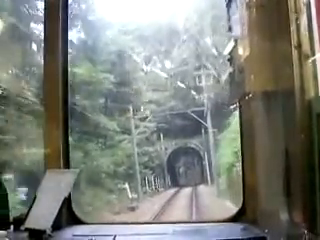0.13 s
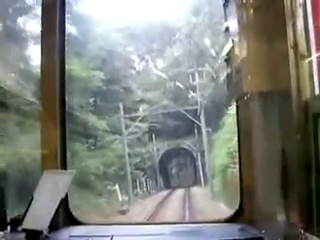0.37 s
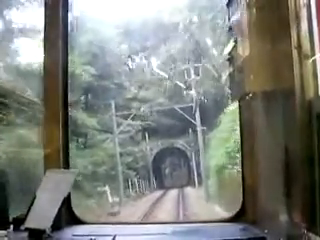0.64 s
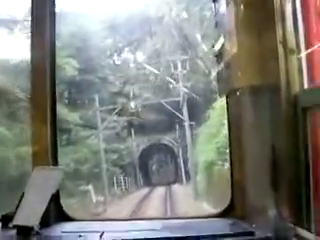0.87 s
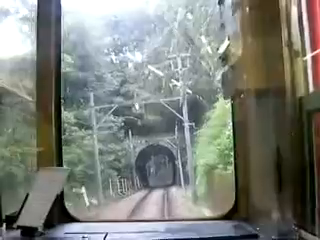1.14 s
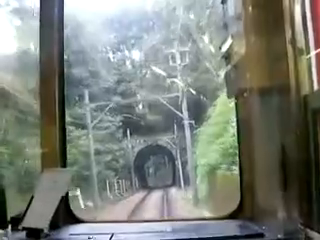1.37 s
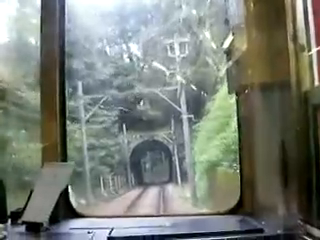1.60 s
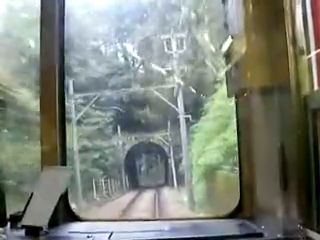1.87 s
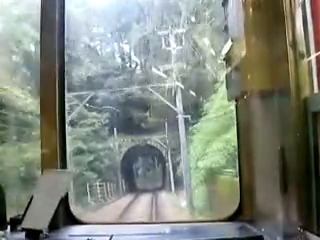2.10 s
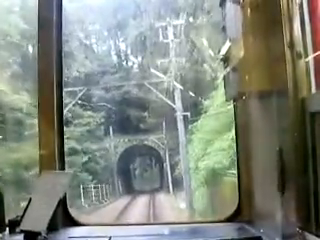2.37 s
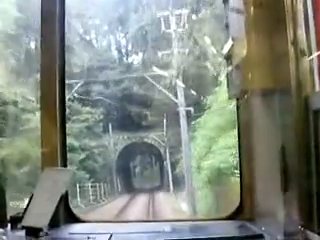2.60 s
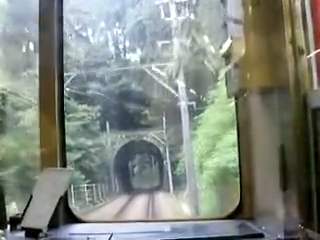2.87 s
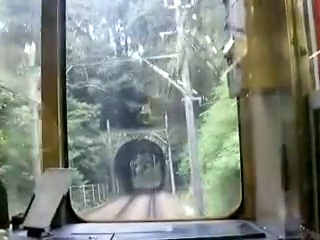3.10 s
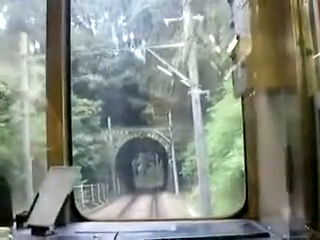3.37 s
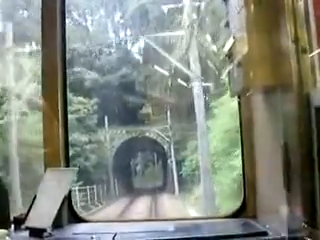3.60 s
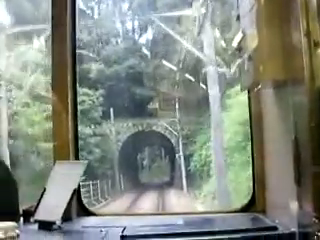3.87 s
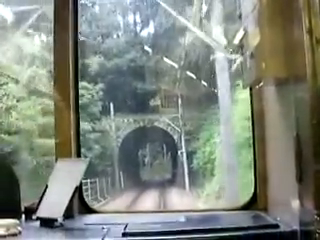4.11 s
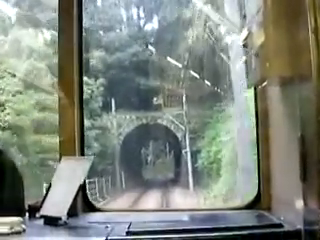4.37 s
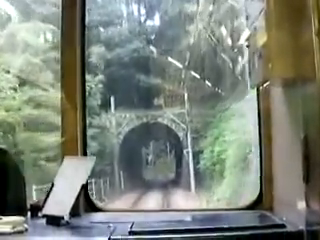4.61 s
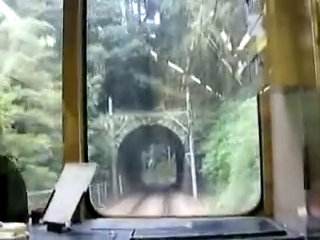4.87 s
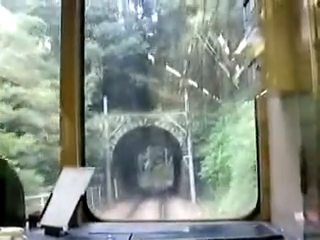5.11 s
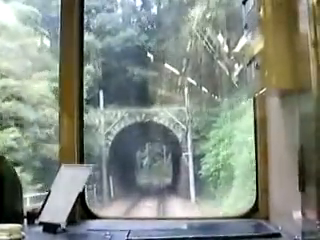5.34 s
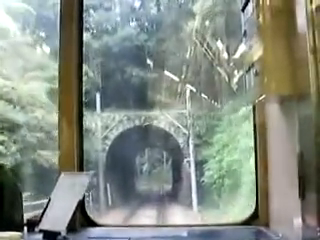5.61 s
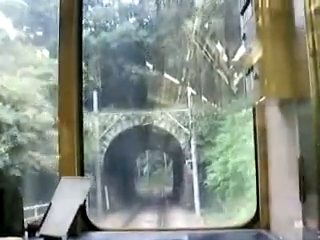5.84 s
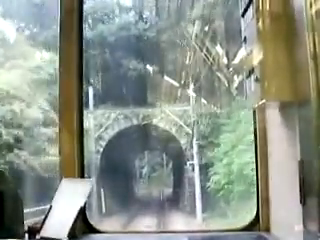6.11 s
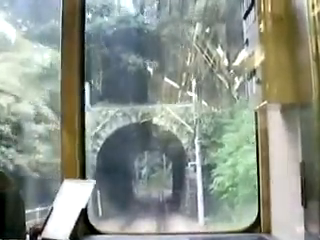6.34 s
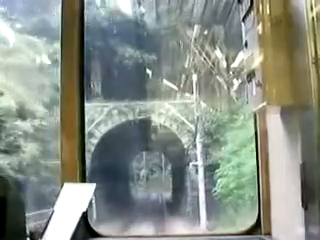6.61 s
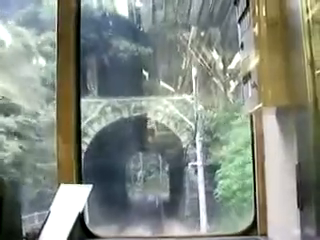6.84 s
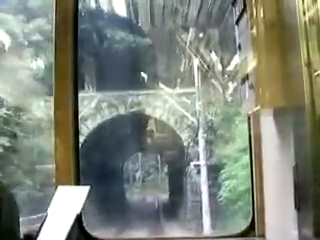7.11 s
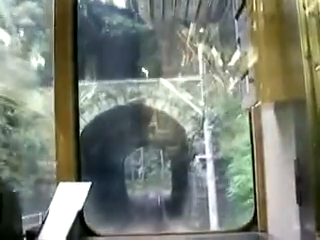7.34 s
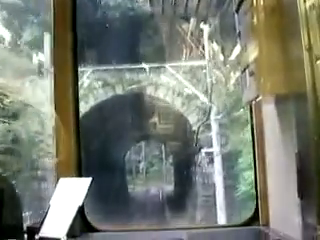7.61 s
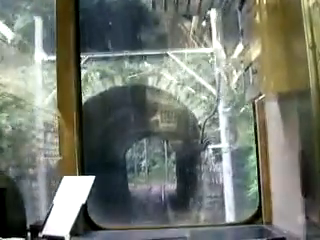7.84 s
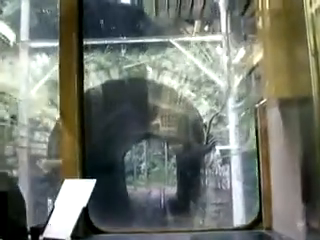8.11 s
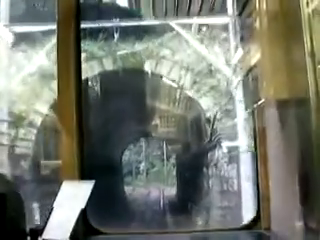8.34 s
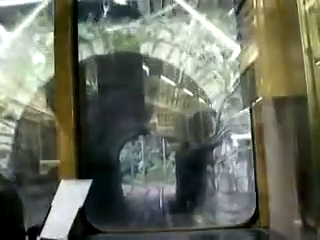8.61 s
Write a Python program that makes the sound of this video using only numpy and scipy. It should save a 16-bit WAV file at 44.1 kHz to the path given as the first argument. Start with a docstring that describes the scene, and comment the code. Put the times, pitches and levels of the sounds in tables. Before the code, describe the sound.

A motor whine holds in the middle of the sound while the floor drones and steel wheels roar beneath an electric train cab. Rail joints strike in clusters, each a metallic clatter with a dull thump, with small squeaks and faint hissing spits in between. The roar grows fuller after the first seconds and the whine climbs gently, ending in more knocks. Close stereo, interior perspective.

```python
"""A low hum, a gear whine and a flurry of rail knocks open the scene, in the cab of an electric railcar.
The car gains a little speed: wavering sines whine upward over body hums and thin blower tones.
Flickering bands of noise make the rumble, floor drone, wheel roar and top hiss; resonances ring the wheels.
Joints clang and thump through shaped noise bursts; short squeaks and bright spits of noise come between.
A close pair of microphone ports hears the bass mostly alike and the treble largely in opposition."""
import sys
import numpy as np
from scipy import signal
from scipy.fft import rfft, irfft, next_fast_len
from scipy.io import wavfile

SR = 44100
rng = np.random.default_rng(int(sys.argv[2]) if len(sys.argv) > 2 else 0)


def unload_audio(sound):
    """Save the sound as a 16-bit wav file, at the path given as the first command line argument."""
    columns = np.transpose(np.atleast_2d(sound))
    # keep every value between -1 and 1, then stretch to whole-number steps
    steps = np.round(np.clip(columns, -1, 1) * 32767)
    wavfile.write(sys.argv[1], SR, steps.astype(np.int16))


N = 384552
SIZE = next_fast_len(N)
HZ = np.maximum(np.arange(SIZE // 2 + 1) * SR / SIZE, 1)
TIME = np.arange(N) / SR

# how the track rocks the heavy frame: t/s, rumble level/dB
TRACK_ROCKING = [(0, -34), (1.2, -33.5), (2.3, -27.5), (3.0, -27), (3.5, -29.5), (4.2, -25), (5.1, -31),
                 (5.8, -25), (7.2, -34), (8.1, -28.5), (8.72, -45)]
# colour of the body rumble: f/Hz, relative level/dB
RUMBLE_COLOUR = [(15, -24), (25, -18), (40, -16), (60, -6), (80, -1), (100, 0.5), (135, -1), (170, -18.5),
                 (210, -33), (270, -15)]
# colour of the floor drone: f/Hz, relative level/dB
DRONE_COLOUR = [(120, -26), (170, 0), (200, -0.5), (260, -10), (310, -7), (350, -26), (420, -10),
                (460, -10.5), (540, -22.5), (650, -30)]
DRONE_DB, DRONE_FOLLOWS = -27, 0.47   # level at mean roar; share of the roar's swing in dB
# how the body shakes on after each thump; levels re thump, before the rise and fall shape it
RUMBLE_SHAKE_DB, DRONE_SHAKE_DB = -6.5, -3.5
SWAY_RISE_S, SWAY_FALL_S = 0.067, 0.31   # the heavy frame answers more slowly than the floor
SHAKE_RISE_S, SHAKE_FALL_S = 0.038, 0.17   # the floor

# how hard the wheel contact roars: t/s, level/dB
ROAR_LEVEL = [(0, -36.5), (.6, -39), (1.2, -39), (1.58, -31), (1.9, -36), (2.28, -37), (3.0, -36),
              (3.33, -33.5), (3.65, -37), (4.15, -32.5), (4.45, -34), (4.86, -31.5), (5.6, -31.5),
              (6.1, -32), (6.8, -32), (7.5, -32), (8.72, -30.5)]
# colour of the wheel roar: f/Hz, relative level/dB
ROAR_COLOUR = [(450, -17), (600, -3), (780, 10), (950, 2.5), (1300, -0.5), (1700, -1), (2200, -1.5),
               (2700, -5.5), (3500, -6.5), (5000, -9.5), (6500, -17.5), (7600, -22.5), (8500, -55)]
# colour of the top hiss: f/Hz, relative level/dB
HISS_COLOUR = [(7600, -16), (8300, 9.5), (9000, 7.5), (10000, 10), (10900, 3), (11500, -30)]
HISS_DB, HISS_FOLLOWS = -55.5, 1.25   # level at mean roar; how many times the roar's swing in dB

# wheel modes: f/Hz, width of each resonance pass/Hz, relative level/dB
WHEEL_MODES = [(490, 26, -26.5), (1135, 40, -8), (1600, 100, -7.5), (2015, 37, -4), (2980, 110, -12.5),
               (3390, 50, -35), (4860, 39, -16)]
# spells of louder ringing, added to the faint one: middle t/s, length/s, peak gain/dB
RING_SPELLS = [(.19, 0.22, -38.5), (1.55, 0.78, -49), (2.17, 0.28, -51)]
RING_DB = -47   # gain of the faint ring all along

# tooth mesh of the motor gearing: t/s, f/Hz, level/dB
TOOTH_MESH = [(0, 446.6, -25.5), (.73, 447.3, -22), (2.86, 449.2, -26.5), (3.45, 450.2, -22.5),
              (4.05, 453.2, -27.5), (5.5, 459.5, -27), (6.3, 465.5, -28), (7.41, 479.8, -28.5),
              (7.87, 484, -48), (8.72, 490, -29.5)]
# other shafts: multiple of the mesh frequency, level/dB, waver/dB
OTHER_SHAFTS = [(.685, -44, 5.5), (2.002, -49, 5)]

# pitches of the two body hums: lower f/Hz, upper f/Hz
HUM_PITCHES = (133.55, 150.4)
# swell and fade of the body hums: t/s, lower level/dB, upper level/dB
HUM_LEVELS = [(0.0, -25.5, -40.5), (0.97, -32, -27), (3.03, -29.5, -25.5), (3.28, -34.5, -48),
              (3.67, -34.5, -28), (4.39, -23, -26.5), (8.72, -31.5, -33.5)]
# thin tones of the blowers: f/Hz, level/dB
BLOWER_TONES = [(764.4, -57), (882.9, -40), (4807, -61.5), (5846, -61.5)]

# rail joints, many in pairs as two axles of a bogie pass a third of a second apart:
# t/s, low clang level/dB, low clang f/Hz, upper clang level/dB re low clang, thump level/dB
RAIL_JOINTS = [(0.0487, -41, 2000, -8, -20.5), (0.141, -43, 2000, -17, -19), (0.223, -40.5, 1950, -26, -29),
               (0.469, -58, 1520, -6, -31.5), (1.513, -39, 1340, -13, -21.5),
               (2.118, -33, 2030, -12, -21.5), (2.475, -36, 1800, -1, -19.5), (2.7795, -41, 1580, -16, -41),
               (3.1, -37, 2010, -22, -20), (3.821, -38.5, 1620, -4, -32), (4.1039, -31.5, 1600, 2, -21),
               (4.1576, -36.5, 1660, -5.5, -27), (4.461, -31.5, 1600, -0.5, -21),
               (5.77, -34, 1750, -4, -23.5), (5.8006, -36, 1590, 0, -21), (5.9365, -33, 1690, 5, -24.5),
               (6.125, -39.5, 1800, 0.5, -34), (6.2858, -38, 1450, 5, -18.5),
               (7.573, -37.5, 1910, -2.5, -27.5), (7.596, -36.5, 2170, -7, -45),
               (7.837, -29.5, 1680, -9, -20), (7.9002, -38, 1550, 2.5, -26),
               (7.949, -39.5, 1450, 0.5, -18.5), (8.171, -30, 1660, -9, -19), (8.2236, -44, 1670, -8, -22)]
UPPER_CLANG_HZ, JOINT_HISS_DB = 3000, -23.5   # hiss level re low clang
CROSSING_S, CLANG_T60_S, THUMP_T60_S = 0.022, 0.24, 0.31

# short squeaks and groans: start t/s, length/s, f/Hz, width of each resonance pass/Hz, level/dB
SQUEAKS = [(.05, 0.11, 526, 13, -30), (.11, 0.064, 460, 39, -22.5), (0.877, .07, 3200, 400, -43.5),
           (1.145, 0.085, 816, 170, -35), (1.129, .17, 1600, 390, -38), (1.87, .2, 1136, 66, -34.5),
           (7.981, 0.063, 435, 25, -23), (8.056, 0.037, 427, 16, -25), (8.248, 0.1, 423, 15, -39)]
# bright spits and puffs of hiss: start t/s, hold length/s, level/dB
SPITS = [(1.31, 0.023, -51.5), (4.648, 0.32, -51), (5.12, 0.29, -54), (5.43, .02, -50), (5.615, .06, -51),
         (7.875, 0.075, -44), (8.476, 0.014, -34.5), (8.605, 0.021, -35)]
SPIT_T60_S = 0.2

# stereo width of the ports: f/Hz, side minus mid level/dB
SIDE_OVER_MID = [(25, -11), (60, -3), (125, -17), (250, -12.5), (450, -21), (600, -18), (880, -13),
                 (1250, -10.5), (2000, -4), (3500, 2), (6300, 2), (11000, 4)]
# lean of the pair: f/Hz, left minus right level/dB
LEFT_OVER_RIGHT = [(40, 3), (100, -0.5), (200, -0.2), (600, -1), (1100, -1.5), (2000, -1.3), (3500, -.3),
                   (6300, 1.5), (11000, 0)]
# what the spacing of the ports gives: f/Hz, share of the side's power taken from the mid
SPACING_SHARE = [(30, .2), (100, 0.59), (500, 1), (1100, 0.01), (12000, 0.01)]
NOTCH_HZ, NOTCH_WIDTH_HZ, CUTOFF_HZ = 7906, 494, 10950


def from_db(db):
    """Decibels to gain."""
    return 10 ** (np.asarray(db) / 20)


def rms_one(x):
    """Scale to rms 1."""
    return x / np.sqrt(np.mean(x ** 2) + 1e-20)


def in_time(rows):
    """Columns of a curve, sample by sample."""
    s, *columns = np.transpose(rows)
    return [np.interp(TIME, s, c) for c in columns]


def at_hz(points):
    """A spectrum read on the whole frequency grid, straight over log frequency."""
    hz, value = np.transpose(points)
    return np.interp(np.log(HZ), np.log(np.maximum(hz, 1)), value)


def drift(rate):
    """Slow random wander of spread 1, from noise smoothed by a double pole; rate in Hz."""
    hop = 40   # samples between drawn points
    r = np.exp(-np.pi * rate * hop / SR)
    slow = signal.lfilter([1], [1, -2 * r, r * r], rng.standard_normal(N // hop + 2002))
    slow = rms_one(slow[2000:])   # skip the filter's settling
    return np.interp(np.arange(N) / hop, np.arange(len(slow)), slow)


def resonance(x, hz, width_hz):
    """Two-pole resonance with a gain of about 1 at its peak."""
    r = np.exp(-np.pi * width_hz / SR)
    poles = [1, -2 * r * np.cos(2 * np.pi * hz / SR), r * r]
    return signal.lfilter((1 - r * r) / 2 * np.array([1, 0, -1]), poles, x)


def sung(noise, hz, width_hz):
    """Noise through a resonance applied twice; rms 1."""
    return rms_one(resonance(resonance(noise, hz, width_hz), hz, width_hz))


def rolling_noise(spectrum, shared_db, patchy_db, rate):
    """Two draws of coloured noise in overlapping half-octave bands that flicker together and alone."""
    low_hz, high_hz = spectrum[0][0], spectrum[-1][0]
    colour = from_db(at_hz(spectrum)) * (HZ > low_hz) * (HZ < high_hz)
    coloured = colour * rfft(rng.standard_normal((2, SIZE)))
    place = 2 * np.log2(HZ)   # in half octaves
    out, together = 0, drift(rate)
    for k in range(int(2 * np.log2(low_hz)), int(2 * np.log2(high_hz)) + 2):
        band = np.cos(np.pi / 2 * np.clip(place - k, -1, 1)) ** 2
        flicker = from_db(shared_db * together + patchy_db * drift(rate))
        out = out + flicker * irfft(band * coloured, SIZE)[:, :N]
    return rms_one(out)


def tone(hz, db, waver_db, loose):
    """A sine wandering in level and pitch; the second draw runs a quarter turn ahead and wavers more."""
    turn = 2 * np.pi * np.cumsum(hz * (1 + loose * drift(5.89))) / SR
    waver = drift(4.06) + [[0], [1.2]] * drift(9.0)
    return np.sqrt(2) * from_db(db + waver_db * waver) * np.sin(turn + [[0], [np.pi / 2]])


def shaking(rise_s, fall_s):
    """Power that the thumps leave in the body, rising and settling."""
    power = 0
    for s, *_, thump_db in RAIL_JOINTS:
        after = np.maximum(TIME - s, 0)
        power = power + from_db(2 * thump_db) * (1 - np.exp(-after / rise_s)) * np.exp(-after / fall_s)
    return power


def body(swing_db):
    """Rumble follows the track, floor drone grows with the roar; thumps set both shaking."""
    # powers add, so the decibels are doubled here and the root taken below
    rumble = from_db(2 * in_time(TRACK_ROCKING)[0])
    rumble = rumble + from_db(2 * RUMBLE_SHAKE_DB) * shaking(SWAY_RISE_S, SWAY_FALL_S)
    drone = from_db(2 * (DRONE_DB + DRONE_FOLLOWS * swing_db))
    drone = drone + from_db(2 * DRONE_SHAKE_DB) * shaking(SHAKE_RISE_S, SHAKE_FALL_S)
    return (np.sqrt(rumble) * rolling_noise(RUMBLE_COLOUR, shared_db=1.6, patchy_db=2.5, rate=2.6)
            + np.sqrt(drone) * rolling_noise(DRONE_COLOUR, shared_db=1.1, patchy_db=2.0, rate=10.4))


def roar(roar_db):
    """Steel wheels rolling on the rails give a broad noise that swells with the contact."""
    return from_db(roar_db) * rolling_noise(ROAR_COLOUR, shared_db=1.18, patchy_db=1.4, rate=5.4)


def top_hiss(swing_db):
    """A thin treble noise that swings further than the roar."""
    level = from_db(HISS_DB + HISS_FOLLOWS * swing_db)
    return level * rolling_noise(HISS_COLOUR, shared_db=1.1, patchy_db=0.5, rate=14.0)


def wheels():
    """Rough contact keeps the wheel modes ringing, faintly all along and louder in spells."""
    rings = sum(from_db(db) * sung(rng.standard_normal((2, N)), hz, width_hz)
                for hz, width_hz, db in WHEEL_MODES)
    gain = from_db(RING_DB)
    for middle_s, length, db in RING_SPELLS:
        gain = gain + from_db(db) * np.cos(np.pi * np.clip((TIME - middle_s) / length, -.5, .5))
    return gain * rings


def gears():
    """The tooth mesh is a nearly clean tone; the other shafts turn in fixed ratio and waver more."""
    mesh_hz, mesh_db = in_time(TOOTH_MESH)
    out = tone(mesh_hz, mesh_db, waver_db=1.79, loose=0.0018)
    return out + sum(tone(order * mesh_hz, db, waver_db, loose=0.0015)
                     for order, db, waver_db in OTHER_SHAFTS)


def hums():
    """Low body hums that swell and fade, and thin blower tones; none follows the speed."""
    low = sum(tone(hz, db, waver_db=3.5, loose=0.01186)
              for hz, db in zip(HUM_PITCHES, in_time(HUM_LEVELS)))
    return low + sum(tone(hz, db, waver_db=1.7, loose=0.0012) for hz, db in BLOWER_TONES)


def joints():
    """Each wheel passing a gap gives a clattering clang, a short hiss and a duller thump through the floor."""
    out, after = np.zeros((2, N)), np.arange(SR // 2) / SR
    low = signal.butter(2, [70, 300], "band", fs=SR, output="sos")
    wide = signal.butter(4, [1000, 5500], "band", fs=SR, output="sos")
    top = signal.butter(4, [8300, 10800], "band", fs=SR, output="sos")
    for s, db, low_hz, high_db, thump_db in RAIL_JOINTS:
        noise = rng.standard_normal((3, 2, len(after)))
        clatter = noise[0] * from_db(5.1 * rng.standard_normal(len(after)))   # uneven metal contacts
        clang = sung(clatter, low_hz, 700) - from_db(high_db) * sung(clatter, UPPER_CLANG_HZ, 1700)
        clang = clang + 0.41 * rms_one(signal.sosfilt(wide, noise[1]))
        clang = clang - 0.96 * sung(clatter, 865, 320)   # the cab panels answer
        wheel_ring = sum(from_db(mode_db) * sung(clatter, hz, width_hz)
                         for hz, width_hz, mode_db in WHEEL_MODES[1:])
        clang = clang + 0.82 * wheel_ring
        clang = clang + from_db(JOINT_HISS_DB) * rms_one(signal.sosfilt(top, noise[1]))
        # holds while the wheel crosses, then rings out
        dying_db = -60 * np.maximum(after - CROSSING_S, 0) / CLANG_T60_S
        blow = from_db(db + dying_db) * (1 - np.exp(-after / 0.0027)) * clang
        # the lows rise later and last longer
        thump = from_db(thump_db - 60 * after / THUMP_T60_S) * (1 - np.exp(-after / 0.015))
        floor_boom = 0.6 * sung(noise[2], 198, 74)
        blow = blow + thump * (rms_one(signal.sosfilt(low, noise[2])) + floor_boom)
        at = round((s - .004) * SR)   # the rise starts a little before the listed time
        out[:, at:at + len(after)] += blow[:, :N - at]
    return out


def squeaks():
    """Narrow bursts of resonant noise that swell and fade."""
    out = np.zeros((2, N))
    for s, length, hz, width_hz, db in SQUEAKS:
        at, count = round(s * SR), round(length * SR)
        voice = sung(rng.standard_normal((2, SR // 2)), hz, width_hz)[:, -count:]
        out[:, at:at + count] += from_db(db) * np.hanning(count) ** .5 * voice
    return out


def spits():
    """Bright noise bursts that start almost at once, hold and die fast."""
    out, after = np.zeros((2, N)), np.arange(SR // 2) / SR
    top = signal.butter(2, [4500, 10800], "band", fs=SR, output="sos")
    for s, length, db in SPITS:
        dying_db = -60 * np.maximum(after - length, 0) / SPIT_T60_S
        shape = from_db(db + dying_db) * (1 - np.exp(-after / .003))
        burst = shape * rms_one(signal.sosfilt(top, rng.standard_normal((2, len(after)))))
        at = round(s * SR)
        out[:, at:at + len(after)] += burst[:, :N - at]
    return out


def scene():
    """All sources, as two draws that the microphone ports turn into mid and side."""
    roar_db, = in_time(ROAR_LEVEL)
    swing_db = roar_db - roar_db.mean()
    rolling = body(swing_db) + roar(roar_db) + top_hiss(swing_db)
    return rolling + wheels() + gears() + hums() + joints() + squeaks() + spits()


def band_limit(x):
    """A steep low-pass at the top of the band."""
    return signal.sosfilt(signal.butter(12, 11970, fs=SR, output="sos"), x)


def record(dry):
    """Two close ports: the side is partly the mid turned a quarter, partly the other draw."""
    mid, other = rfft(dry, SIZE)
    share = np.clip(at_hz(SPACING_SHARE), 0, 1)
    side = from_db(at_hz(SIDE_OVER_MID)) * (1j * np.sqrt(share) * mid + np.sqrt(1 - share) * other)
    lean = from_db(at_hz(LEFT_OVER_RIGHT) / 2)   # half to each port
    off = (HZ - NOTCH_HZ) / NOTCH_WIDTH_HZ
    treble = off ** 2 / (1 + off ** 2) * (HZ < CUTOFF_HZ)   # deep notch below a steep cut
    ports = np.array([(mid + side) * lean, (mid - side) / lean])
    mix = irfft(treble * ports, SIZE)[:, :N]
    return band_limit(mix)


dry = scene()
out = record(dry)
unload_audio(out)
```